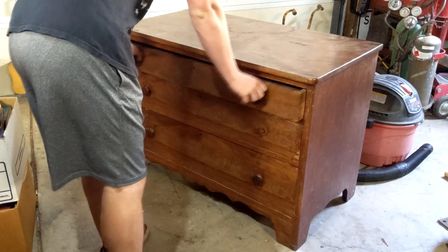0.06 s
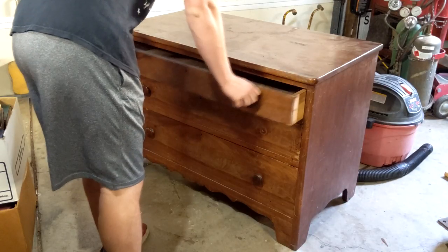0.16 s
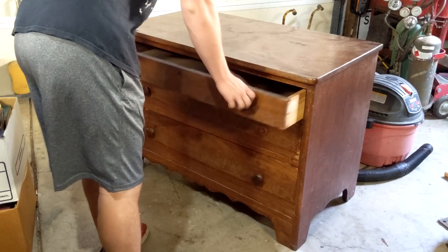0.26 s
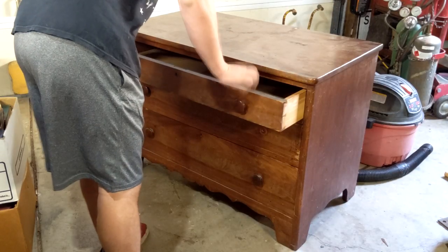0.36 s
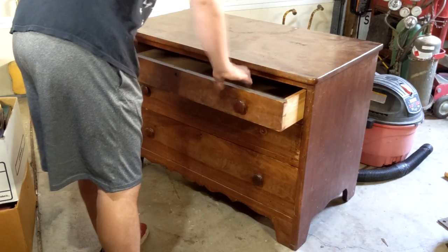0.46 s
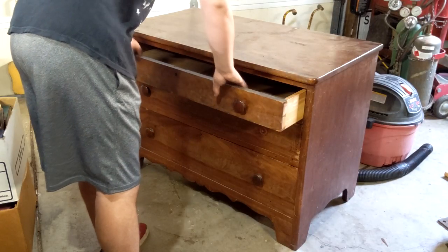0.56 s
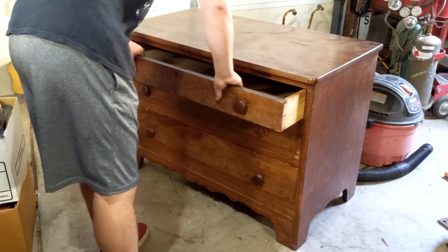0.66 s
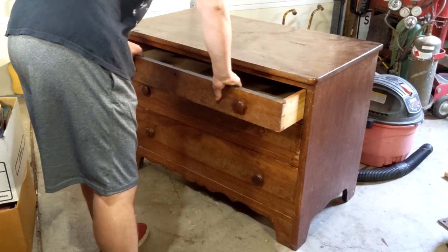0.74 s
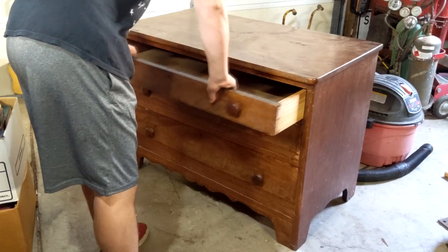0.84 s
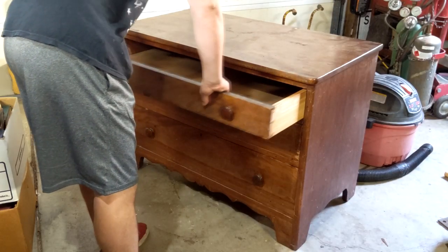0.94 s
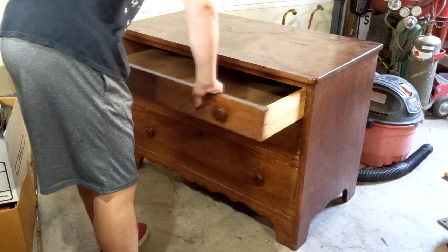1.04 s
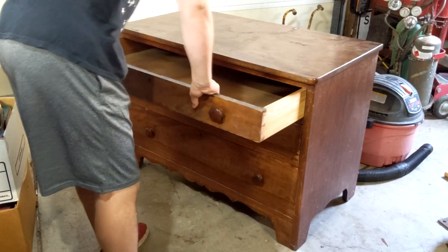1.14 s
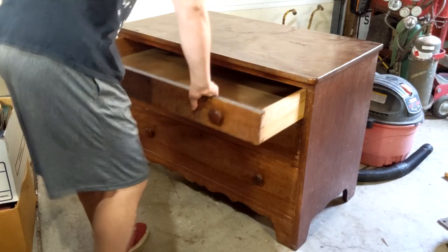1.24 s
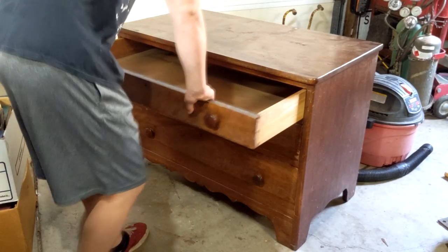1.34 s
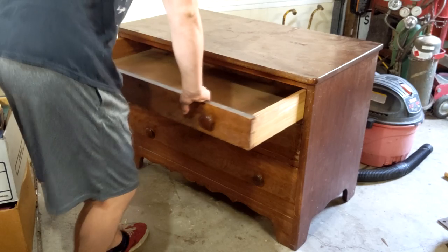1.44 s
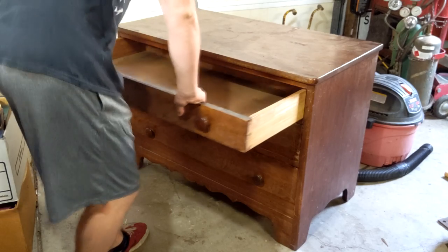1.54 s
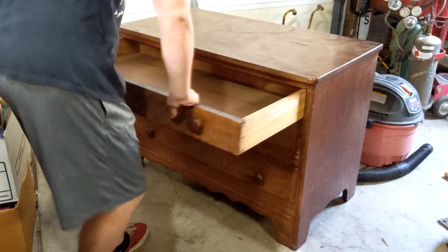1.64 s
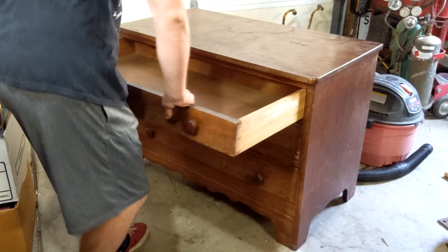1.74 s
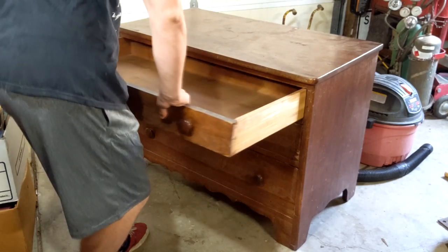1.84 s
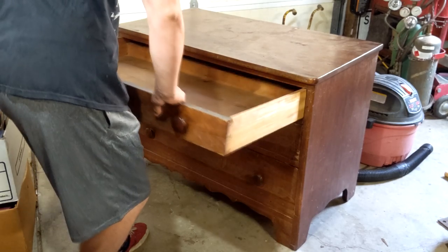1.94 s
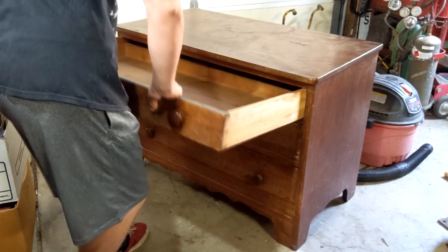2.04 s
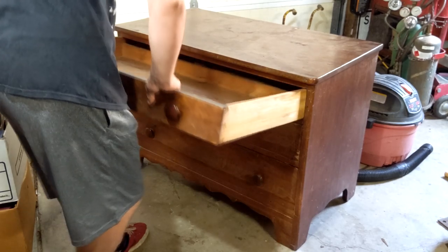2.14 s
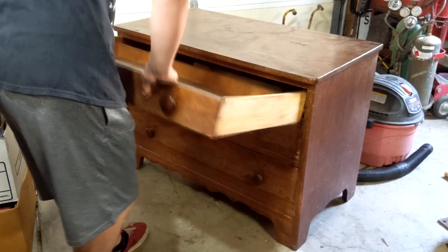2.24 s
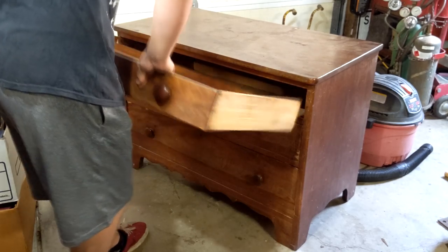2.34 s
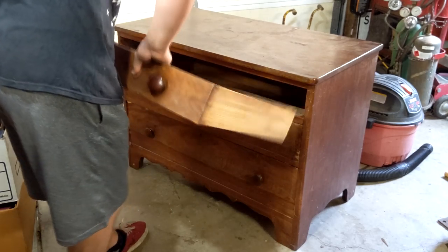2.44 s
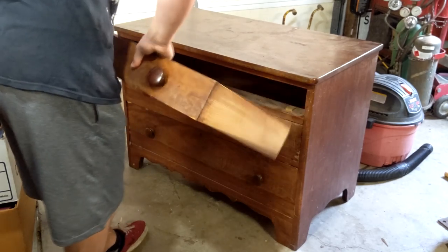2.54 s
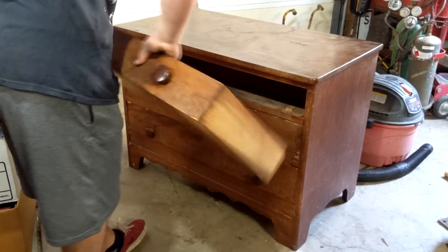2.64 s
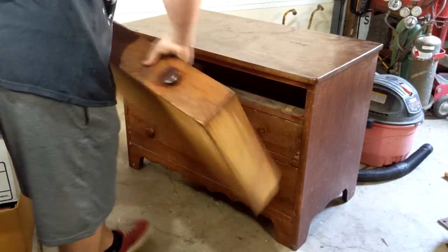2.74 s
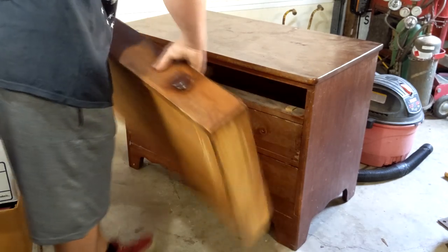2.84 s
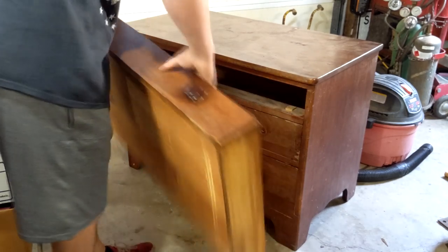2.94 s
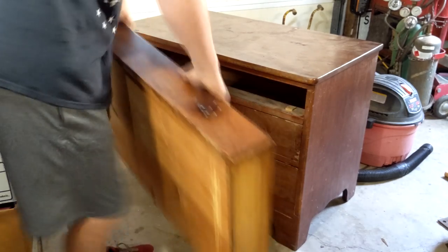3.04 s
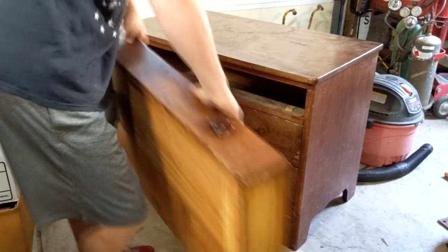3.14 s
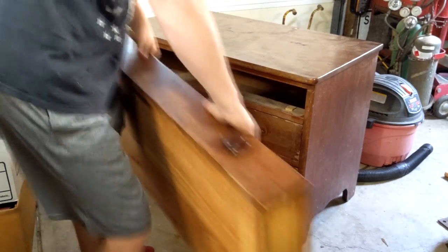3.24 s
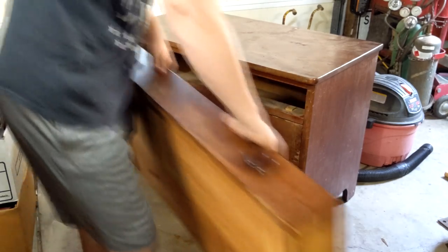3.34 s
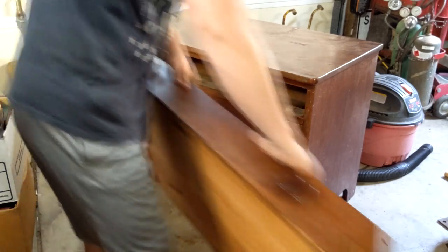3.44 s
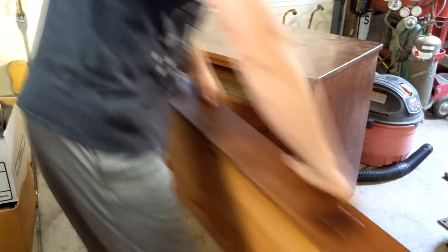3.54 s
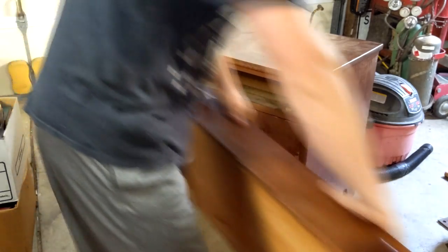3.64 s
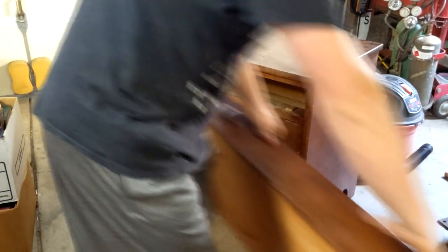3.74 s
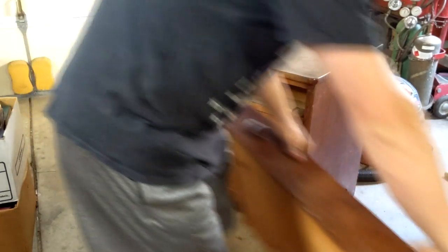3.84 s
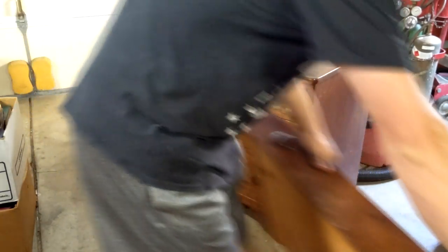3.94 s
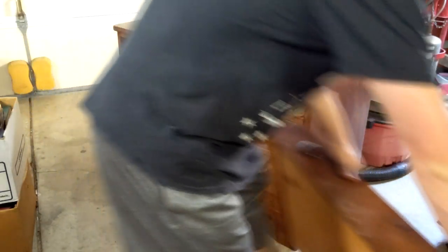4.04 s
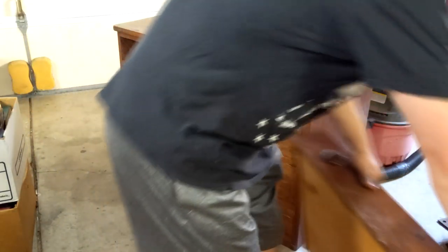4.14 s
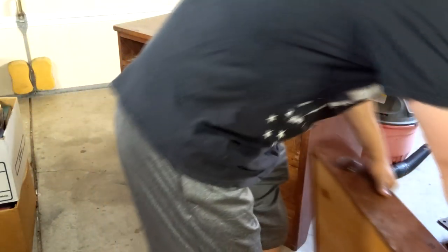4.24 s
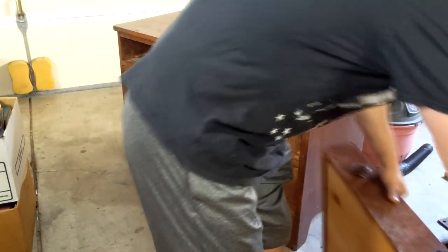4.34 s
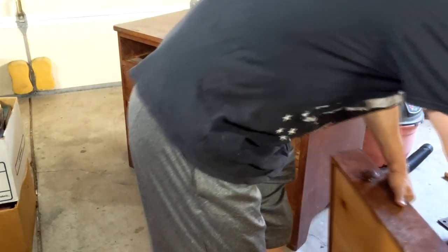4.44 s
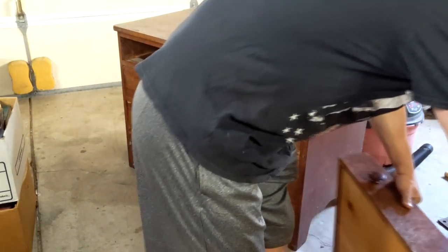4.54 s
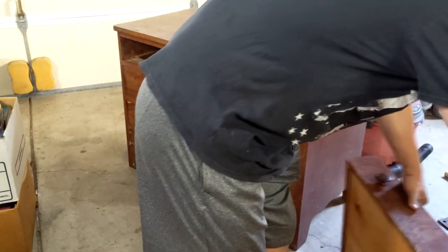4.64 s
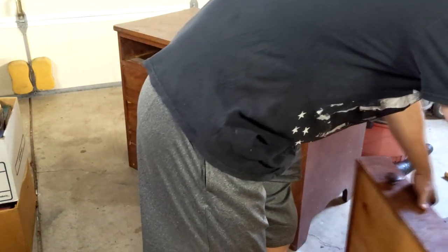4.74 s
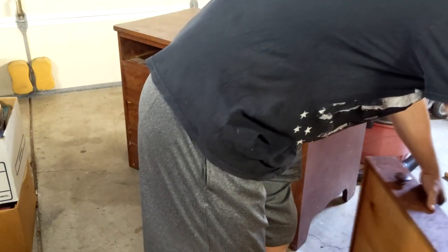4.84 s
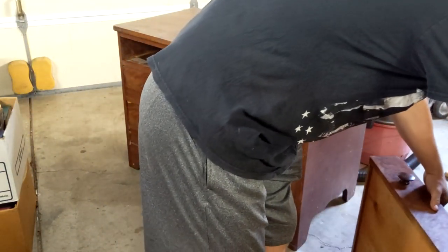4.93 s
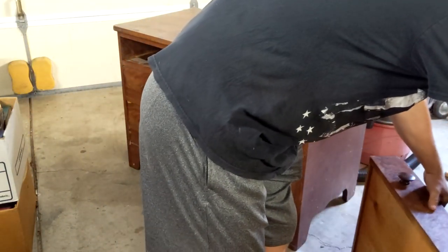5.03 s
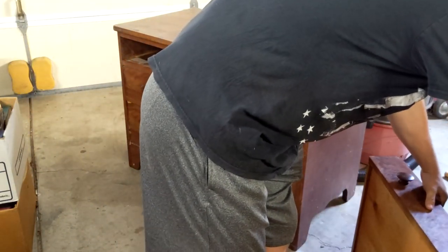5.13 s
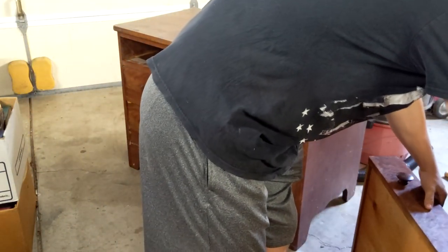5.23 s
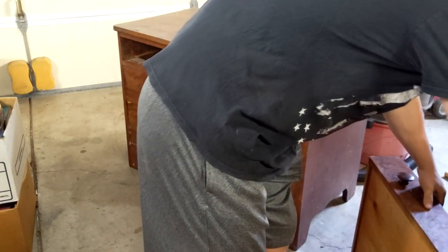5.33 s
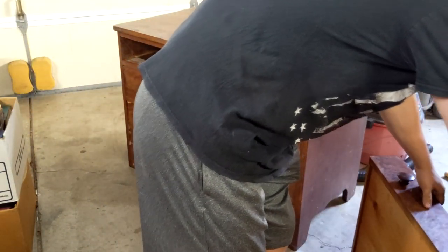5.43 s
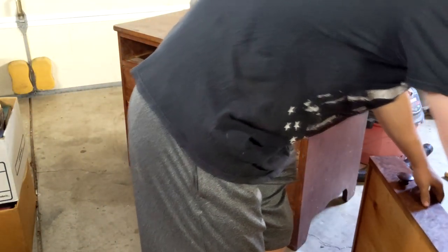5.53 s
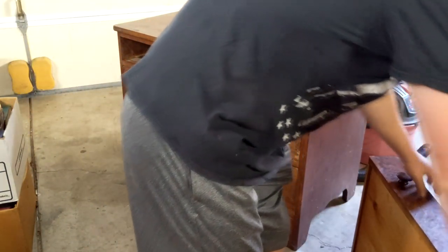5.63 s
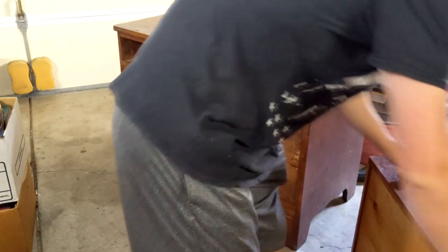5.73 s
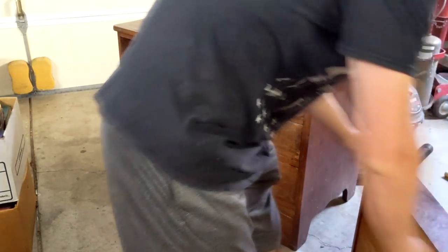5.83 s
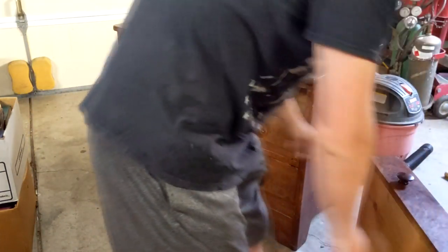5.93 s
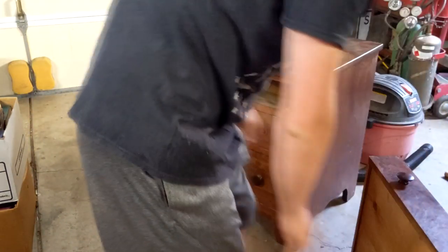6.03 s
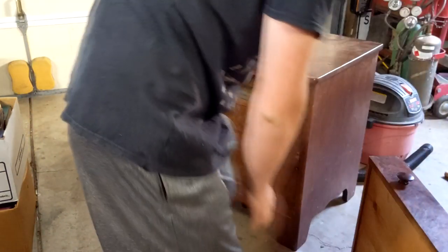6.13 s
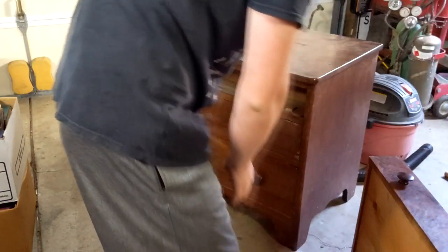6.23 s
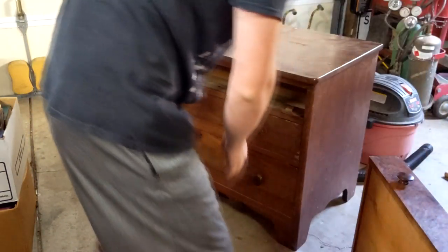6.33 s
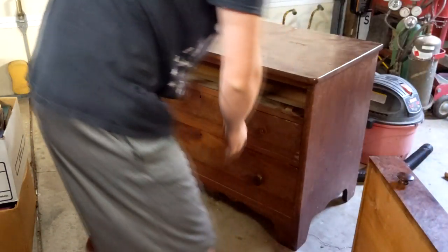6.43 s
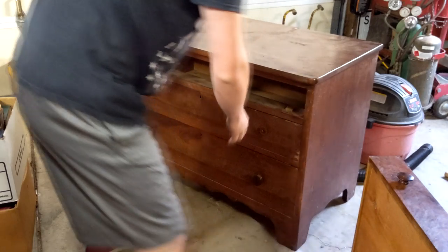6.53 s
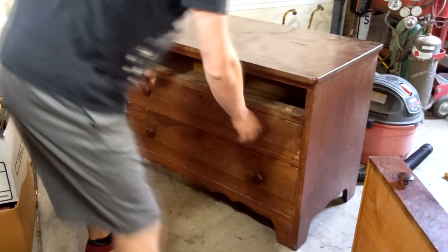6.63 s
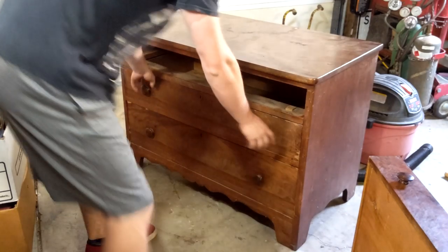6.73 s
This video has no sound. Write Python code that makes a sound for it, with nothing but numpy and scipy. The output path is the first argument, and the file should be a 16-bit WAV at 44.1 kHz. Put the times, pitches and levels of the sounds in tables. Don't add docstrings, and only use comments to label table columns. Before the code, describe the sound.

A stuck drawer judders along dry wooden runners, rumbling and knocking inside a hollow chest with faint squeaks. After it comes free there are only soft sandy footsteps and light wood taps. Then several bright, hard wooden knocks on a concrete floor with a short scrape and low thud, and finally faint shoe scuffs. Garage reverberation and a steady faint drone, heard in stereo from nearby.

```python
import sys
import numpy as np
from scipy import signal
from scipy.fft import rfft, irfft
from scipy.io import wavfile
from scipy.ndimage import uniform_filter1d

SR = 44100
rng = np.random.default_rng(int(sys.argv[2]) if len(sys.argv) > 2 else 0)


def store_wav(level_fs):
    pcm = np.round(np.clip(np.atleast_2d(level_fs), -1, 1) * 32767)
    wavfile.write(sys.argv[1], SR, pcm.T.astype(np.int16))


def boost_factor(decibels):
    exponent = np.asarray(decibels, float) / 20
    return 10 ** exponent


N = 298998
TIME = np.arange(N) / SR

# f/Hz, width/Hz, level/dB
CHEST_PANELS = [(214.7, 39, 3.5), (263, 32, 7.5), (324, 42, 1), (447, 61, 3), (522, 85, -6),
                (634, 64, -0.5), (780, 67, -7), (886, 174, -5.5), (978, 41, -8.5), (1250, 314, -19),
                (1600, 95, -11.5), (1760, 1800, -32)]
# f/Hz, width/Hz, level/dB
DRAWER_PANELS = [(254.3, 24, 12), (343, 33, -0.5), (447, 68, 2), (540, 130, -12.5), (672, 140, -2),
                 (815, 99, -2.5), (964, 125, -2), (1238, 580, -19), (1440, 300, -7.5), (1760, 340, -9)]
# f/Hz, width/Hz, level/dB
EDGE_MODES = [(2360, 430, 14.5), (3130, 300, 21.5), (3270, 1200, 17.5), (4230, 2100, 12.5), (5440, 850, -7),
              (5570, 380, 19.5), (7350, 1200, -2), (10600, 9900, -18)]
# f/Hz, width/Hz, level/dB
RUNNER_MODES = [(2180, 940, 6), (2680, 1100, 29), (4100, 890, -61.5), (6050, 490, 21), (7260, 1200, -57)]
# f/Hz, width/Hz, level/dB
CHEST_CAVITY = [(112.75, 8.7, -1.5), (166, 46, -13)]
# f/Hz, width/Hz, level/dB
DRAWER_CAVITY = [(145.8, 6.5, 4), (196, 6.1, 0)]
# t/s, length/s, carcass rumble level/dB, cavity boom level/dB, grit level/dB
TUGS = [(0.086, 0.2, -65, -57.5, -60.5), (0.261, 0.16, -47.5, -46, -58.5), (.42, .15, -59, -53.5, -62.5),
        (0.64, 0.16, -44.5, -53, -73), (0.766, 0.14, -44, -56.5, -70.5), (0.968, 0.13, -46, -38, -63.5),
        (1.126, 0.17, -61, -55, -58.5), (1.29, .17, -40.5, -45, -57), (1.547, 0.31, -49.5, -51.5, -63.5),
        (1.784, 0.43, -54, -68, -62.5), (2.136, 0.23, -48.5, -47, -60.5), (2.355, 0.19, -52, -47.5, -58),
        (2.67, 0.052, -51, -67, -91), (2.8, .06, -55, -77, -82)]
TUG_RISE = 0.28


def along(table, hz):
    f, v = np.transpose(table)
    return np.interp(np.log(np.maximum(hz, 1)), np.log(f), v)


def unit(x):
    return x / np.sqrt(np.mean(x ** 2))


def colour(x, spectrum):
    size = x.shape[-1]
    gain = boost_factor(along(spectrum, np.fft.rfftfreq(size, 1 / SR)))
    return unit(irfft(rfft(x) * gain, size))


def ring(force, modes):
    total = 0
    for k, (hz, width, db) in enumerate(modes):
        b, a = signal.iirpeak(hz, hz / width, fs=SR)
        total = total + (-1) ** k * boost_factor(db) * signal.lfilter(b, a, force)
    return total


def body(modes, bins, low_hz, top_hz):
    hz, width, db = np.transpose(modes)[:, :, None]
    detuning = (bins ** 2 - hz ** 2) / (width * (bins + 1))
    power = np.sum(boost_factor(2 * db) / (1 + detuning ** 2), axis=0)
    power = power / (1 + (bins / top_hz) ** 6) / (1 + (low_hz / (bins + 1)) ** 6)
    fold = irfft(np.log(power + 1e-12))
    fold[len(bins) - 1:] = 0
    fold[0] /= 2
    return np.exp(rfft(fold))


def pair(size):
    # f/Hz, correlation
    likeness = [(60, 1), (200, 0.9), (500, 0.37), (1000, 0.52), (2000, 0.017), (16000, 0.036)]
    like = np.clip(along(likeness, np.fft.rfftfreq(size, 1 / SR)), -.9, 1)
    weights = np.sqrt([(1 + like) / 2, (1 - like) / 2])
    mid, side = rfft(rng.standard_normal((2, size))) * weights
    return irfft(np.array([mid + side, mid - side]), size)


def walk(rate):
    k = int(SR / rate)
    held = np.repeat(rng.standard_normal(N // k + 1), k)
    return uniform_filter1d(uniform_filter1d(held, k), k)[:N]


def grains(size, rate, spread_db):
    hit, strength, sign = rng.random((3, size))
    level = boost_factor(-spread_db * np.log(strength + 1e-6))
    return (hit < rate / SR) * level * np.sign(sign - .5)


def steady(x, seconds):
    k = int(seconds * SR)
    power = uniform_filter1d(uniform_filter1d(x ** 2, k), k)
    return x / np.sqrt(power + 1e-12)


def even(spectrum, hz):
    mid, side = spectrum.mean(0), spectrum[0] - spectrum[1]
    total = np.cumsum(abs(mid) ** 2 + abs(side) ** 2 / 4)
    low, high = hz * .88 - 15, hz * 1.12 + 15
    power = (np.interp(high, hz, total) - np.interp(low, hz, total)) / (high - low)
    return spectrum / np.sqrt(power + 1e-12)


def effort(table, rise, t60):
    grid = np.arange(0, TIME[-1] + .002, .002)
    start, length = np.transpose(table)[:2, :, None]
    since = grid - start
    attack = np.clip(1 - since / (np.clip(rise, .05, 1) * length), 0, None)
    decay = np.clip(since - length, 0, None) / np.reshape(t60, (-1, 1))
    onset_db = -13.5
    shape = boost_factor(onset_db * attack - 60 * decay) * (attack < 2)

    def level(db):
        return np.interp(TIME, grid, np.sqrt(boost_factor(2 * np.atleast_1d(db)) @ shape ** 2))
    return level


def garage():
    # f/Hz, t60/s
    room_t60 = [(60, 0.27), (160, 0.42), (420, 0.31), (1100, 0.28), (2900, 0.37), (7700, 0.28),
                (16000, 0.29)]
    t = np.arange(SR * 2 // 5) / SR
    noise, hz = rfft(pair(2 * SR)), np.fft.rfftfreq(2 * SR, 1 / SR)
    octave = np.log2(np.maximum(hz, 30) / 30)
    bands = np.array([irfft(noise * np.clip(1 - abs(octave - k), 0, 1)) for k in range(11)])
    fades = np.array([boost_factor(-60 * t / along(room_t60, 30 * 2 ** k)) for k in range(11)])
    fades = fades * (1 - np.exp(-(t / .007) ** 2))
    direct = np.arange(len(t)) == np.array([[4], [0]])
    direct_db = -5.5

    def spot(near_db=0):
        start = rng.integers(SR)
        tail = np.einsum("bct,bt->ct", bands[:, :, start:start + len(t)], fades)
        return tail / np.sqrt(np.sum(tail ** 2) / 2) + boost_factor(direct_db + near_db) * direct
    return spot


def hum():
    # f/Hz, level/dB per Hz
    hum_spectrum = [(12, -43), (20, -5), (65, -3), (133, -16.5), (172, -14), (220, -19), (364, -26.5),
                    (482, -24), (732, -22.5), (1840, -40.5), (4750, -39), (6830, -39), (9540, -40.5),
                    (11300, -48.5), (15800, -46.5)]
    air = colour(pair(N), hum_spectrum)
    bass = signal.sosfilt(signal.butter(2, 150, fs=SR, output="sos"), air)
    swell = np.sqrt(uniform_filter1d(bass.mean(0) ** 2, SR // 6) / np.mean(bass ** 2))
    return boost_factor(-56) * (air + bass * (swell ** -.7 - 1))


def grit():
    # t/s, length/s, hiss level/dB, finest sand and dull rub level/dB above hiss
    scuffs = [(0.202, 0.076, -58.5, -5.5, 5), (0.596, 0.014, -51, -11.5, -2), (1.001, 0.017, -48.5, -20, 0),
              (1.315, 0.034, -55.5, -8.5, 3), (1.417, 0.028, -57, -4, 7), (1.508, .06, -49.5, -9.5, -20),
              (1.545, 0.073, -44, -8.5, -26), (1.861, 0.032, -57.5, -10, 2.5), (2.948, .08, -67.5, -9, 5.5),
              (3.022, 0.094, -58.5, -4.5, -13), (3.096, 0.092, -51.5, -7.5, -5.5),
              (3.288, 0.11, -64.5, -6.5, 2), (3.649, 0.028, -64, -4, 0.5), (3.698, 0.22, -68, -6, 2.5),
              (3.968, 0.064, -63, -9, 5.5), (4.201, 0.055, -60, -5.5, -18), (4.282, 0.21, -67.5, -7, -10),
              (5.792, 0.15, -57.5, -8, -21), (5.867, .13, -54, -9.5, -15), (6.172, 0.078, -63.5, -8, -9),
              (6.372, 0.018, -58, -7, -20), (6.611, 0.048, -63, -6, 5), (6.736, .1, -60, -6, -1)]
    # f/Hz, level/dB per Hz
    sand_spectrum = [(1060, -1), (1800, -6), (3280, 0), (3820, -3.5), (5760, -2), (6780, -11.5),
                     (7630, -6.5), (8500, -11), (13900, -16), (15800, -22.5)]
    # f/Hz, level/dB per Hz
    rub_spectrum = [(120, -17), (220, 0), (300, -3), (500, 2.5), (900, -7.5), (1300, -7), (1900, -10.5),
                    (2600, -40)]
    crush = grains(N, 10000, 2.4) * boost_factor(2.5 * walk(90))
    density = np.sqrt(uniform_filter1d(crush ** 2, 60) + 0.81)
    sand = colour(pair(N) * density, sand_spectrum)
    hiss = colour(sand, [(7000, 0), (7600, -30)])
    fine = colour(sand, [(6500, -30), (7100, 0)])
    dull = colour(pair(N) * boost_factor(3.6 * walk(60)), rub_spectrum)

    scuff = effort(scuffs, rise=0.34, t60=0.36)
    db, fine_db, dull_db = np.transpose(scuffs)[2:]
    runner = effort(TUGS, TUG_RISE, t60=.25)(np.transpose(TUGS)[4])
    layers = hiss * np.hypot(scuff(db), runner)
    layers = layers + fine * np.hypot(scuff(db + fine_db), runner * boost_factor(-13))
    layers = layers + dull * np.hypot(scuff(db + dull_db), runner * boost_factor(2.5))
    return layers * boost_factor(np.array([[1.6], [-1.6]]) / 2)


def squeaks():
    # t/s, length/s, level/dB, f/Hz, width/Hz
    tones = [(0.793, 0.12, -69, 1100, 70), (1.8, 0.079, -65, 860, 63), (2.25, .22, -61, 800, 56),
             (2.3, .085, -59, 720, 58), (1.52, .12, -55, 2900, 900), (5.03, 0.066, -52, 2420, 90),
             (5.015, .075, -57, 5880, 200), (0.28, 0.076, -42.5, 464, 58), (1.015, 0.076, -39, 640, 120),
             (2.14, 0.072, -46, 440, 80), (4.95, 0.077, -46, 1000, 290), (5.2, 0.041, -50, 3200, 180),
             (6.38, .03, -61.5, 5400, 900), (0.64, .15, -55.5, 263, 50), (4.69, 0.082, -47.5, 450, 250),
             (4.0, .07, -68, 2600, 200)]
    slips, out = pair(N) * boost_factor(2.6 * walk(70)), np.zeros((2, N))
    for s, length, db, hz, width in tones:
        span = slice(max(int(s * SR) - SR // 5, 0), int(s * SR) + SR // 2)
        narrow = ring(slips[:, span], [(hz, width, 0)])
        rung = unit(ring(narrow, [(hz, 2 * width, 0)]))
        out[:, span] += rung * effort([(s, length)], rise=0.22, t60=.15)(db)[span]
    return out


def thud():
    # t/s, length/s, level/dB, t60/s
    shudders = [
        (4.62, 0.096, -44, .15),
        (4.89, 0.16, -43.5, 0.27),
        (5.15, .09, -43, 1.1),
    ]
    # f/Hz, width/Hz, level/dB
    slab = [(50.2, 18, 0)]
    db, t60 = np.transpose(shudders)[2:]
    shake = ring(ring(rng.standard_normal(N), slab), slab)
    return steady(shake, 0.014) * effort(shudders, 0.36, t60)(db)


def drag(room):
    # t/s, length/s
    pushes = [
        (5.03, .18),
    ]
    slips = grains(N, 2500, 4.0) * boost_factor(6.7 * walk(60))
    edges = unit(ring(slips, EDGE_MODES)) * boost_factor(-61)
    panels = unit(ring(slips, DRAWER_PANELS)) * boost_factor(-57)
    dry_drag = effort(pushes, rise=0.49, t60=.05)(0) * (edges + panels)
    return signal.fftconvolve(dry_drag[None], room, axes=1)[:, :N]


def knocks(table, panels, boom, edge, spot, blow, swell, own_db, own_q, push_s, top_hz, crack_hz, cycles):
    size = 2 ** 15
    out, t, bins = np.zeros((2, N + SR)), np.arange(size) / SR, np.fft.rfftfreq(size, 1 / SR)
    for s, wood_db, boom_db, crack_db, hz in table:
        chatter = max(cycles / hz, .002)
        room = rfft(spot(), size)
        first = blow * boost_factor(min(crack_db - wood_db + 28, 0))
        slips = grains(size, 2500, 1.7) * np.exp(-(t / chatter) ** 2)
        slow_force = slips * (1 + swell * t / chatter) + first * (t == 0)
        quick_force = slips * np.exp(-t / chatter) + first * (t == 0)
        slow = even(rfft(slow_force) * room, bins)
        quick = even(rfft(quick_force) * room, bins)

        tilt = .07 * (crack_db - wood_db + 25)
        modes = [(f, width, db + tilt * np.log2(f / 500)) for f, width, db in panels]
        modes = modes + [(hz, hz / own_q, own_db)]
        touched = np.array(edge) * (1 + [.04, .2, 0] * rng.uniform(-1, 1, (len(edge), 3)))
        wood = irfft(slow * body(modes, bins, 165, top_hz))[:, :SR // 2]
        crack = irfft(quick * body(touched, bins, 910, crack_hz))[:, :SR // 2]
        push = np.exp(-(t / (push_s + chatter / 2)) ** 2) * np.sin(2 * np.pi * boom[0][0] * t)
        hollow = ring(push, boom)[None]

        start = int(s * SR)
        for heard, db in (wood, wood_db), (hollow, boom_db + 6), (crack, crack_db):
            loudest = np.sqrt(uniform_filter1d(heard.mean(0) ** 2, SR // 50).max())
            out[:, start:start + heard.shape[1]] += heard * boost_factor(db - 6.5) / loudest
    return out[:, :N]


def taps(spot):
    # t/s, panel peak level/dB, boom level/dB, crack level/dB, strongest panel f/Hz
    touches = [(2.863, -82, -80, -85, 624), (3.108, -52.5, -67, -81, 890), (3.183, -41, -82, -85, 945),
               (3.645, -53.5, -80, -92, 664), (4.005, -49.5, -80, -73, 666), (4.291, -53.5, -78, -83, 724),
               (4.344, -58, -71, -68, 689), (6.201, -69, -73, -66, 730), (6.365, -54, -86, -83, 1050),
               (6.376, -47, -78, -88, 1300), (6.619, -41, -71, -70, 1080)]
    return knocks(touches, DRAWER_PANELS[3:], DRAWER_CAVITY, RUNNER_MODES, lambda: spot(near_db=4.5),
                  blow=13.0, swell=.1, own_db=2.8, own_q=5.9, push_s=0.0054,
                  top_hz=1270, crack_hz=8100, cycles=4.9)


def drops(spot):
    # t/s, panel peak level/dB, boom level/dB, crack level/dB, contact's own panel f/Hz
    corners = [
        (4.638, -24, -34, -37.5, 422),
        (4.917, -47.5, -75, -46, 318),
        (4.937, -29.5, -39.5, -36, 317),
        (5.016, -35, -41, -39, 665),
        (5.053, -41, -47, -42.5, 330),
        (5.134, -37, -45, -41, 778),
        (5.199, -29.5, -37.5, -37.5, 780),
    ]
    return knocks(corners, DRAWER_PANELS, DRAWER_CAVITY, EDGE_MODES, spot,
                  blow=4.0, swell=0.51, own_db=0, own_q=10.0, push_s=0.002,
                  top_hz=1410, crack_hz=12500, cycles=4.2)


def slide(room):
    # f/Hz, width/Hz, level/dB
    carcass = [(51.3, 5.9, -7.5), (72.6, 9, -9)]
    rumble_db, boom_db = np.transpose(TUGS)[2:4]
    pull = effort(TUGS, TUG_RISE, t60=0.54)
    slips = grains(N, 400, 5.7)
    rumble = steady(ring(ring(slips, carcass), carcass), 0.21) * pull(rumble_db)
    boom = steady(ring(ring(slips, CHEST_CAVITY), [(117, 200, 0)]), 0.12) * pull(boom_db)
    panels = steady(ring(slips, CHEST_PANELS), 0.047) * pull(boom_db - 11)
    return rumble + boom + signal.fftconvolve(panels[None], room, axes=1)[:, :N]


def jerks(spot):
    # t/s, panel peak level/dB, boom level/dB, crack level/dB, strongest panel f/Hz
    jumps = [(0.101, -46.5, -53, -53.5, 520), (0.205, -49, -58, -57, 414), (0.294, -32, -43, -75, 447),
             (0.602, -36, -24, -52.5, 457), (1.008, -18.5, -33, -44, 257), (1.32, -31, -37.5, -62, 520),
             (1.42, -46, -45, -48, 271), (1.58, -45.5, -48, -74, 410), (1.876, -53, -67, -53.5, 340),
             (2.129, -35, -73, -58, 432), (2.165, -37, -66, -70, 256)]
    return knocks(jumps, CHEST_PANELS, CHEST_CAVITY, RUNNER_MODES, spot,
                  blow=5.3, swell=0.65, own_db=8.3, own_q=15, push_s=0.016,
                  top_hz=1620, crack_hz=5500, cycles=9.5)


def scene():
    spot = garage()
    echoing = hum() + drag(spot()) + taps(spot) + drops(spot) + jerks(spot)
    echoing = echoing * boost_factor(np.array([[0.96], [-0.96]]))
    return echoing + grit() + squeaks() + thud() + slide(spot())


def low_pass(x):
    return signal.sosfilt(signal.butter(12, 15920, fs=SR, output="sos"), x)


def record(dry):
    return low_pass(dry)


dry = scene()
out = record(dry)
store_wav(out)
```